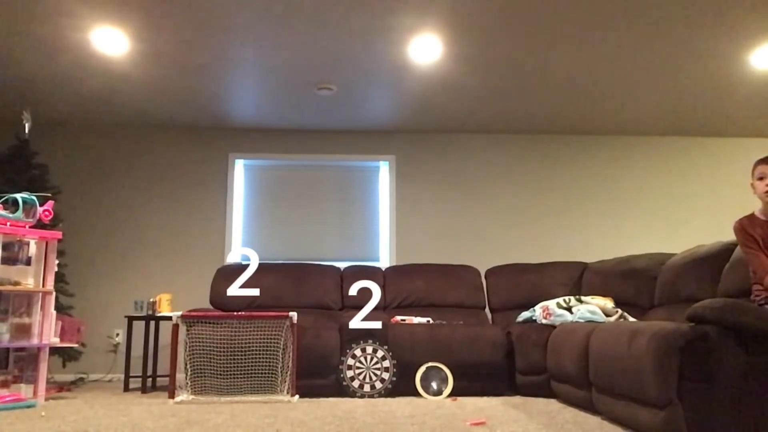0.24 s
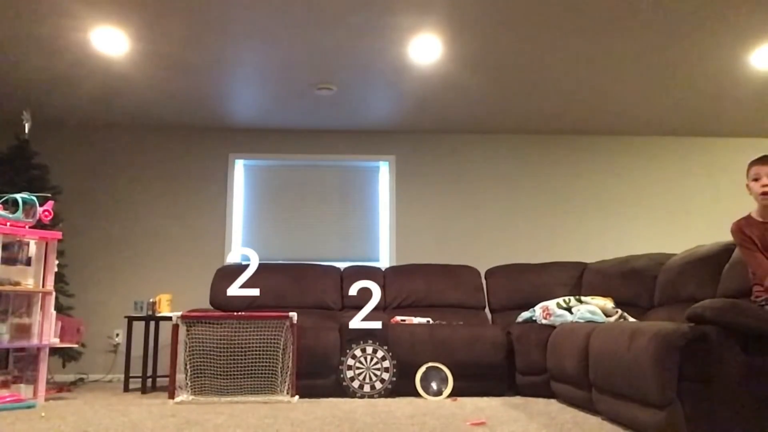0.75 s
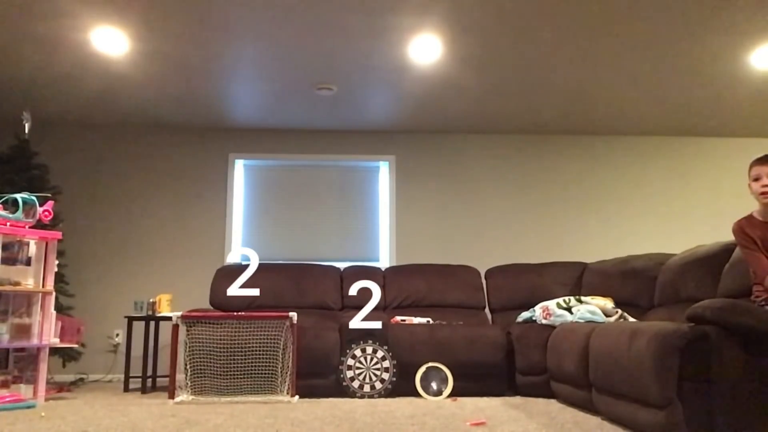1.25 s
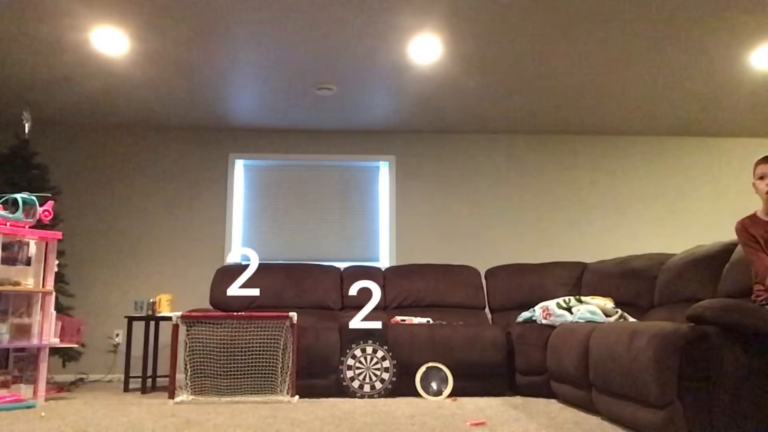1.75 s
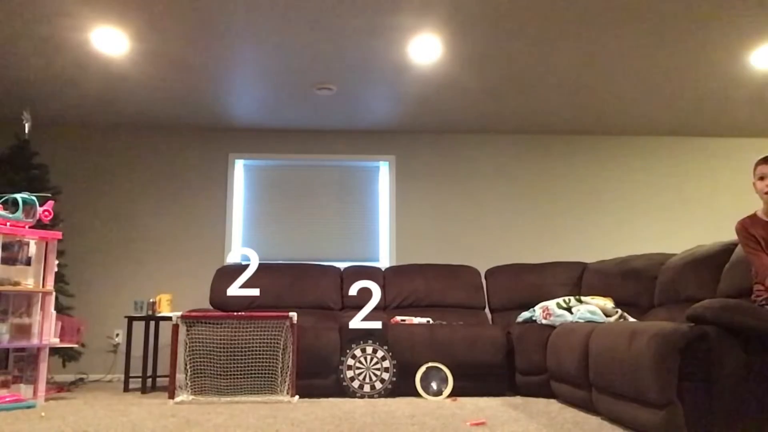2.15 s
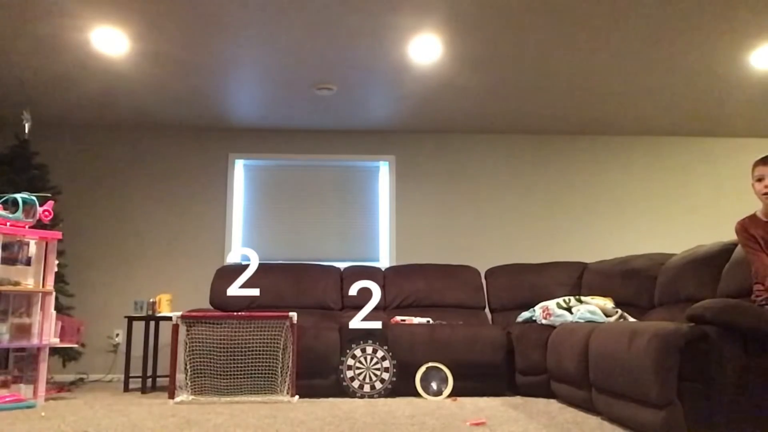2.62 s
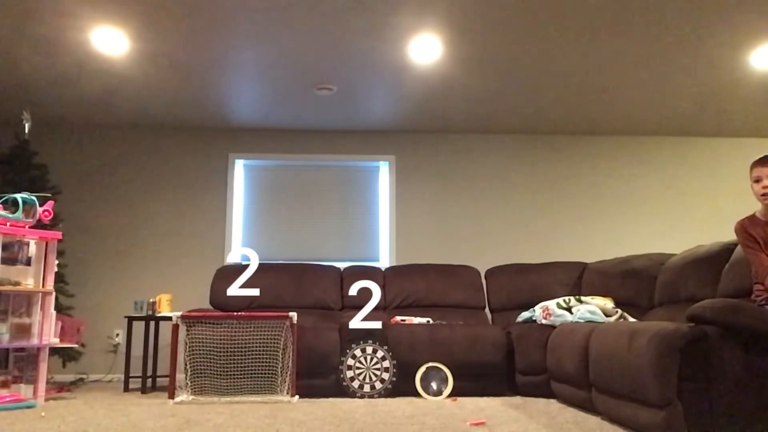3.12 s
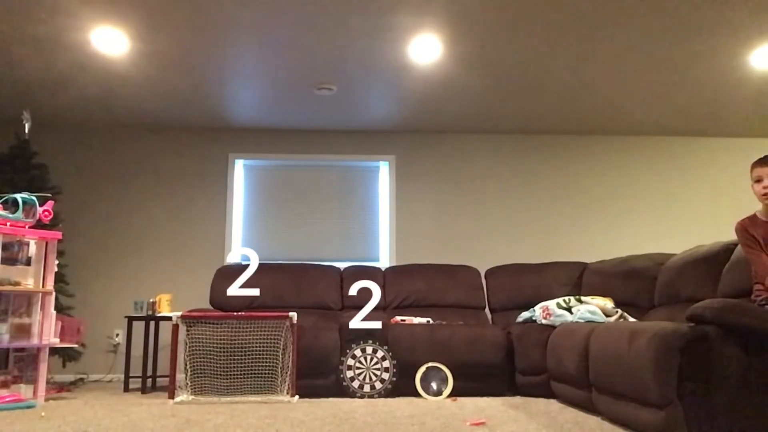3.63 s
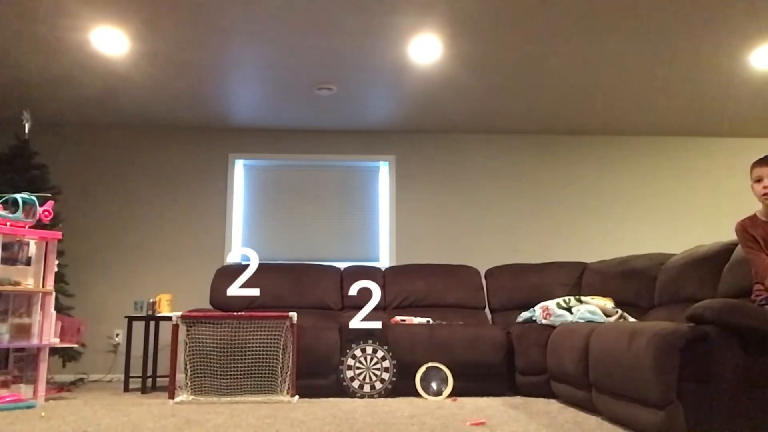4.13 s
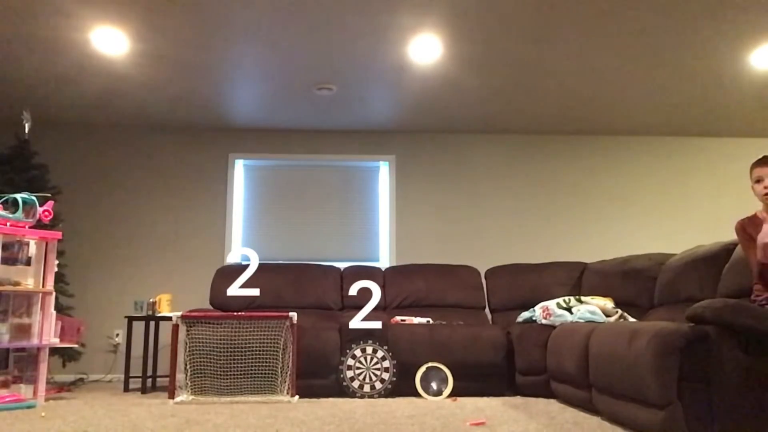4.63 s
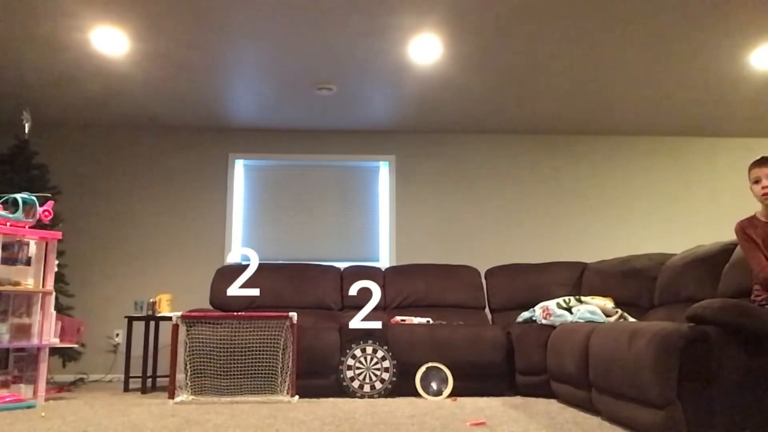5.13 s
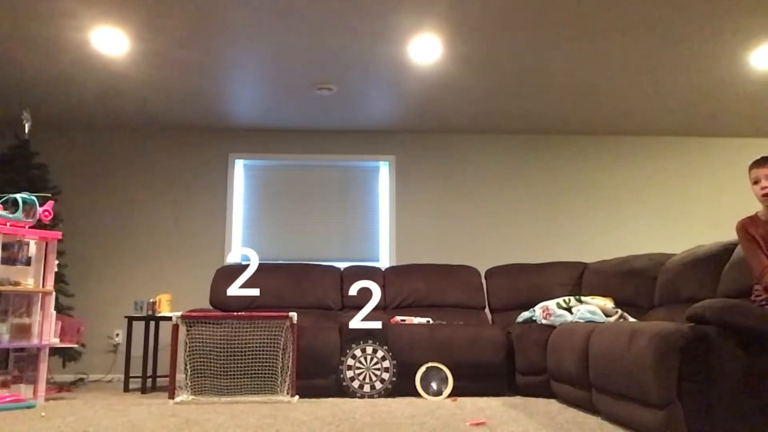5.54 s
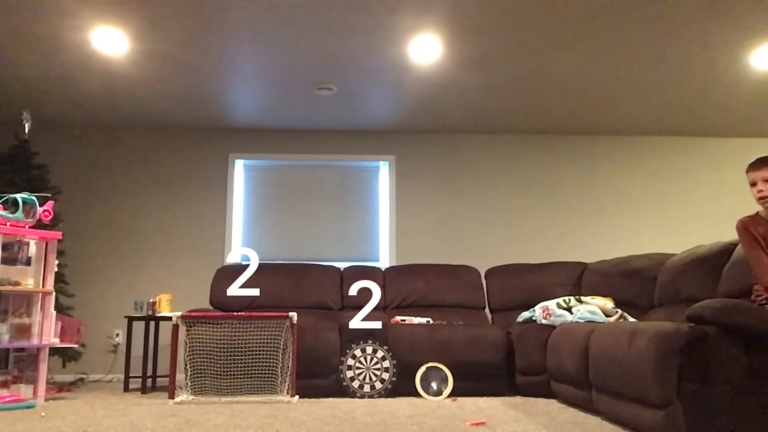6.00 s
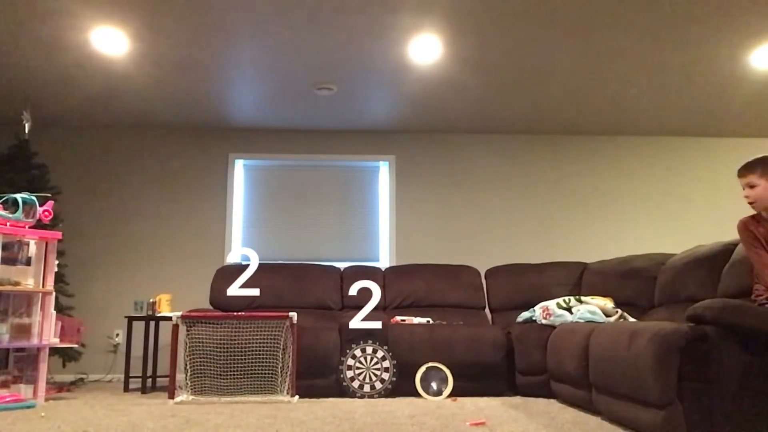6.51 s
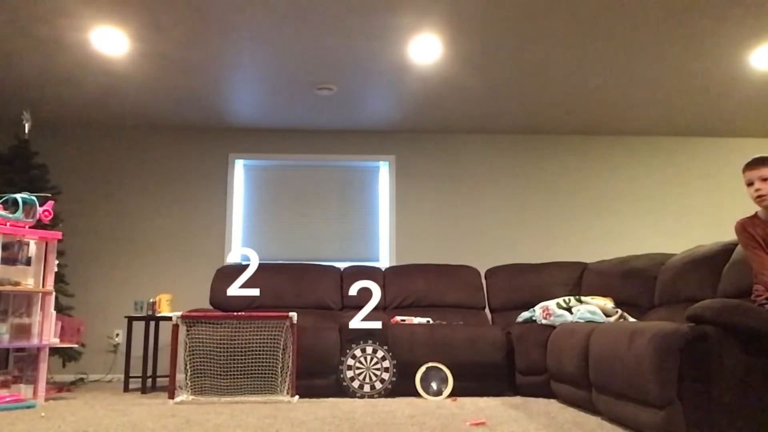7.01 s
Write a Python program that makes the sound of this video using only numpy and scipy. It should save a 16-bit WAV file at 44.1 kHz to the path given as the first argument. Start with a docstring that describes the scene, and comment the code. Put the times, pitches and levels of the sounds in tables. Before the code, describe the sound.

A plastic dart blaster is handled with light clicks, cocked with two sharp latch snaps, then fired with a hollow airy pop in a carpeted living room.

```python
"""Toy dart blaster indoors

A plastic dart blaster is handled, cocked and fired close to a phone in a carpeted living room.
Its ticks, latches and snaps are short noise cracks plus fading tones of the shell, body, grip and spring.
The shot adds a plunger slam, ringing air in the barrel and a puff of noise; a room echo follows it all.
Soft thuds of low noise come through the floor, over steady humming tones and faint hiss."""
import sys
import numpy as np
from scipy import signal
from scipy.fft import rfft, irfft
from scipy.io import wavfile
from scipy.ndimage import uniform_filter1d

SR = 44100
rng = np.random.default_rng(int(sys.argv[2]) if len(sys.argv) > 2 else 0)


def unload_wav(signal):
    """Save mono or channel-first audio to the path in sys.argv[1] as 16-bit WAV at rate SR, clipped to [-1, 1]."""
    wavfile.write(
        sys.argv[1],
        SR,
        np.round(np.clip(np.atleast_2d(signal).T, -1, 1) * 32767).astype(np.int16),
    )


N = 320301
TIME = np.arange(N) / SR

# In tables of tones and noise colours, levels are relative: the whole is scaled where it is used.
# A blow's ring level is shifted by ring_db for the direction; "over ring" counts from the listed level.

# hum of an appliance: f/Hz, rms level/dB around which it wavers
HUM_TONES = [(120, -54.5), (200, -81), (240, -82), (341, -84)]
# colour of the still room and microphone hiss: f/Hz, level/dB
FLOOR_COLOUR = [(25, -16.5), (40, -6), (55, 6.5), (72, 14.5), (100, 6.5), (160, 0.5), (230, -5.5),
                (330, -6.5), (450, -15), (800, -18.5), (1600, -19.5), (4000, -24.5), (10000, -29.5),
                (11800, -24), (12600, -32.5), (15000, -35)]
FLOOR_DB = -61  # rms level of that noise
# soft thuds through the floor: t/s, t60/s, level/dB
THUD_EVENTS = [(.262, 0.32, -46), (4.0, .98, -47), (5.02, 1.75, -53), (5.45, 1.1, -40), (5.76, 1.1, -50.5),
               (6.122, 0.18, -40), (6.82, .31, -48), (6.89, 0.9, -46)]
# colour of a thud: f/Hz, level/dB
THUD_COLOUR = [(25, -49.5), (42, -6.5), (60, 3.5), (88, 7.5), (115, -7.5), (170, -20.5), (300, -39.5),
               (800, -74.5)]
THUD_RISE_S = 0.021
# lowest room tones, woken by the shot: f/Hz, level/dB, t60/s
BOOM_TONES = [(61.6, -1.5, 0.37), (54.6, -10, .3), (124, -3.5, 0.25)]
# room reflections by pitch: f/Hz, level/dB, early t60/s, late t60/s
ROOM_BANDS = [(150, 1, 0.3, 0.34), (500, -10.5, 0.34, 0.79), (1080, -4.5, 0.26, .72),
              (1560, -12.5, 0.52, .75), (2100, -4, 0.16, 0.62), (3250, 0.5, .32, 0.8),
              (4740, -4.5, 0.24, 0.76), (8000, -8.5, .28, .52), (11100, -5.5, 0.25, .46),
              (15000, -8, 0.16, .36)]
SIDE_COUNT = 3  # directions in which the blaster's sound reaches the room

# hands rubbing on plastic: t/s, length/s, level/dB
HAND_RUBS = [(0.327, .15, -55), (1.175, 0.082, -65.5), (1.425, 0.053, -68), (1.834, 0.078, -67.5),
             (7.159, 0.089, -62.5)]
# colour of rubbing and scraping: f/Hz, level/dB
RUB_COLOUR = [(200, -9.5), (900, 2.5), (1500, 11.5), (2300, -1), (3100, -3.0), (5500, -7),
              (10000, -11.0), (15000, -16.5)]
# the padded grip: f/Hz, level/dB, t60/s
GRIP_TONES = [(195, 2.5, 0.051), (255, -4.5, 0.087), (328, -3, 0.15), (418, 1.5, 0.068)]
# steel spring and catch: f/Hz, level/dB, t60/s
SPRING_TONES = [(6400, -2.5, .02), (6760, 1, 0.029), (8140, -2.5, .03), (8970, -2.5, 0.062),
                (9720, -0.5, 0.024), (10500, -4, .025)]
# hollow shell: f/Hz, level/dB, t60/s
SHELL_TONES = [(1176, -9, 0.028), (1300, -7, 0.031), (1511, 1, 0.037), (1740, -2.5, .022),
               (1903, -5.5, .028), (2031, -3.5, 0.011), (2320, -12.5, .02), (2732, -8.5, .04),
               (3056, -10, .035), (3315, -14, 0.034), (3890, -13.5, 0.04), (4700, -13.5, 0.02)]
# the whole body flexing: f/Hz, level/dB, t60/s
BODY_TONES = [(426, -5.5, 0.03), (537.6, 0.5, 0.026), (690, 2, 0.029), (802, -3, 0.032),
              (894.6, 0.5, 0.024), (1032, -4.5, 0.03)]
# colour of the crack of hard plastic: f/Hz, level/dB
CRACK_COLOUR = [(200, -26.5), (800, -12.5), (2000, 1), (3200, -1), (4600, 2), (5500, 0.5), (6600, 1),
                (8500, 2), (10500, 0.5), (12500, -3), (15500, -13)]

# hands knock the blaster: t/s, shell ring level/dB,
# then level/dB over ring of: crack, low knock, grip bump, tick of a loose part
KNOCK_EVENTS = [(0.2218, -50, -10, 4.5, 10, -4), (.252, -46, -8, 0, 2.5, -4),
                (.348, -36, -20.5, -7, -6, -12.5), (.400, -42.5, -17, 6, -6, -8),
                (0.996, -57, 2, -7, -15, -23), (1.256, -52.5, -16, -6, -15, -23),
                (1.514, -49.5, -24, -2, -6, -24), (2.02, -55.5, -14, 0, -2, -24),
                (2.062, -54, -4, -2, -11.5, -19.5), (2.407, -43.5, -14, -18.5, -18, 0),
                (2.4372, -42.5, -5.5, -11, -11.5, -1), (2.447, -43, 2, -11, -20.5, -1.5),
                (2.579, -48, -22, 1.5, -15.5, -12), (2.773, -39, -2.5, -3.5, -16.5, -16),
                (6.564, -59.5, -4, -8, -16, -13), (7.183, -44.5, -16, -1, -14.5, -22)]
# the loose part's delay after a knock; its crack and low knock over its own ring
LOOSE_S, LOOSE_CRACK_DB, LOOSE_KNOCK_DB = .0105, -0.5, -4.5
# latches snap while cocking: t/s, shell ring level/dB,
# then level/dB over ring of: crack, low knock, spring ping, second contact
LATCH_EVENTS = [(2.5922, -33, 2.5, -16.5, -5, -17), (2.6180, -29.5, 5.5, -10, 5.5, -2.5),
                (2.7375, -27, 9, 2, -10, -5), (3.685, -30.5, 8.5, -12, 1.5, -7),
                (3.7053, -28.5, 9.5, -8, 11, 4), (3.7141, -12.5, 0, -5, -6, -12.5)]
# delay of a latch's second contact; jolt of the grip over the latch's ring
SEAT_S, LATCH_GRIP_DB = .0072, -26.5
# the slide is pulled back, then pushed home: t/s, length/s, first ring level/dB, last ring level/dB
SLIDE_STROKES = [(2.705, 0.027, -35.5, -34.5), (3.6357, .051, -49, -27)]
# typical time between the slide's catches and its scatter (share of that time)
CHATTER_S, CHATTER_SCATTER = 0.012, .1
CHATTER_CRACK_DB, CHATTER_KNOCK_DB, SCRAPE_DB = -2.5, -9, -9  # over ring

# catch lets go, plunger slams, dart leaves: t/s, shell ring level/dB,
# then level/dB over ring of: crack, low knock
SHOT_EVENTS = [(6.1224, -30.5, 1.5, -13), (6.1244, -25, 13, -10), (6.128, -26, -8.5, -4.5)]
# the plunger's first rebound: delay after the slam and ring level
# each further rebound: delay multiplied by the growth, level raised by the step
REBOUND_S, REBOUND_GROWTH, REBOUND_DB, REBOUND_STEP_DB = 0.0065, 2.6, -30.5, 1
REBOUND_CRACK_DB, REBOUND_KNOCK_DB = 2.5, -2  # over ring
SHOT_GRIP_DB = -36.5  # recoil of the grip
# air column of the barrel: f/Hz, level/dB, t60/s
BARREL_TONES = [(167.5, -12, 0.033), (414, 0, 0.081), (974, 8, 0.063), (1169, -2, 0.15), (1560, 7.5, 0.046),
                (2020, -3, 0.049), (2914, -2, 0.19), (3340, -3.5, 0.067), (4160, -4.5, 0.087),
                (4800, -2, 0.27)]
# colour of the escaping air: f/Hz, level/dB
AIR_COLOUR = [(60, 0), (250, -6.5), (700, -27.5), (1400, 7), (2300, -1), (3200, -2), (5000, 2), (7500, -1),
              (11000, 1.5), (15000, -11)]
TOP_HZ = 15900  # upper limit of the phone's sound


def undb(db):
    """Turn decibels into gain."""
    return 10 ** (np.asarray(db) / 20)


def unit(x):
    """Scale to rms 1."""
    return x / np.sqrt(np.mean(x ** 2))


def fade(t, t60):
    """Exponential decay: 60 dB down after t60 seconds."""
    return np.exp(-np.log(1000) * t / max(t60, 1e-4))


def add(out, s, x):
    """Mix x into out from second s on."""
    i = int(max(s, 0) * SR)
    out[i:i + len(x)] += x[:max(N - i, 0)]


def highpass(x, hz):
    """Take away the bass below hz."""
    sos = signal.butter(4, hz, "high", fs=SR, output="sos")
    return signal.sosfilt(sos, x)


def colour(x, points, size=8192):
    """Filter x to follow the colour points, without pre-echo; white noise keeps its power."""
    hz, db = np.transpose(points)
    f = np.maximum(np.fft.rfftfreq(size, 1 / SR), 1)
    curve_db = np.interp(np.log(f), np.log(hz), db)
    # folding the cepstrum makes the filter respond only after its input
    cepstrum = irfft(np.log(undb(curve_db)))
    cepstrum[1:size // 2] *= 2
    cepstrum[size // 2 + 1:] = 0
    response = irfft(np.exp(rfft(cepstrum)))
    return signal.fftconvolve(x, response / np.linalg.norm(response))[:len(x)]


def walk(rate):
    """Slow random drift around 0 with about rate new values a second."""
    knots = np.arange(0, TIME[-1] + 1, 1 / rate)
    return np.interp(TIME, knots, rng.standard_normal(len(knots)))


def ring(tones, detune):
    """Struck tones, starting near rms 1; each blow lands elsewhere and the grip shifts them a little."""
    t = TIME[:int(SR * max(tone[2] for tone in tones))]
    out, power = 0, 0
    for hz, db, t60 in tones:
        shift, scatter_db, side = rng.standard_normal(3)
        gain = undb(db + scatter_db)
        wave = np.sin(2 * np.pi * hz * (1 + detune * shift) * t)
        out = out + np.sign(side) * gain * wave * fade(t, t60)
        power += gain ** 2 / 2
    return out / np.sqrt(power)


def swell(x, rise_s):
    """Let a ring build up while the push lasts."""
    return x * np.minimum(TIME[:len(x)] / rise_s, 1)


def burst(rise_s, t60, size=2048, order=2):
    """Dense noise that swells and dies, its energy spread almost evenly over all pitches."""
    t = TIME[:size]
    shape = np.minimum(t / rise_s, 1) * fade(np.maximum(t - rise_s, 0), t60)
    x = rng.standard_normal(size) * shape
    for _ in range(order):
        # level all pitches, then shape in time again
        even = irfft(np.exp(1j * np.angle(rfft(x))))
        x = even * np.sqrt(shape)
    return x * np.linalg.norm(shape) / np.linalg.norm(x)


def background():
    """An appliance hums, each tone wavering slightly in level, over low rumble and hiss."""
    hum = np.zeros(N)
    for hz, db in HUM_TONES:
        gain = np.sqrt(2) * undb(db + .5 * walk(4.5))
        hum += gain * np.sin(2 * np.pi * (hz * TIME + rng.random()))
    return hum + undb(FLOOR_DB) * unit(colour(rng.standard_normal(N), FLOOR_COLOUR))


def thuds():
    """Shifting weight and the jolt of the shot stir floor and room: low noise that rises and dies away."""
    power = np.zeros(N)
    t = TIME[:SR]  # each thud lasts a second at most
    for s, t60, db in THUD_EVENTS:
        shape = np.minimum(t / THUD_RISE_S, 1) * fade(np.maximum(t - THUD_RISE_S, 0), t60)
        add(power, s, (undb(db) * shape) ** 2)
    low_noise = colour(rng.standard_normal(N), THUD_COLOUR)
    # even out the noise's own swings in loudness
    low_noise /= np.sqrt(uniform_filter1d(low_noise ** 2, size=3000) + 1e-12)
    return low_noise * np.sqrt(power)


def boom():
    """The jolt of the shot sets the room's lowest tones swinging; they build up and die away."""
    out = np.zeros(N)
    swing = swell(ring(BOOM_TONES, detune=.01), rise_s=0.018)
    add(out, SHOT_EVENTS[0][0], undb(-32.5) * swing)
    return highpass(out, hz=41.8)


def room(x, late_db=-13, build_s=0.0061):
    """Walls and ceiling answer at once; sofa and carpet soak up most, leaving a weak longer tail."""
    t = TIME[:SR]
    # the first reflections stand out one by one, later ones merge
    uneven_db = 6 * fade(t, .25) * rng.standard_normal(SR)
    noise = rfft(rng.standard_normal(SR) * undb(uneven_db))
    log_f = np.log(np.maximum(np.fft.rfftfreq(SR, 1 / SR), 1))
    centres = np.log(np.array(ROOM_BANDS)[:, 0])
    response = 0
    # each band overlaps its neighbours and fades at its own speed
    for share, (hz, db, early, late) in zip(np.eye(len(ROOM_BANDS)), ROOM_BANDS):
        decay = fade(t, early) + undb(late_db) * fade(t, late)
        shape = decay * np.minimum(t / build_s, 1) ** 2
        band = irfft(noise * np.interp(log_f, centres, share), SR)
        response = response + undb(db) * band * shape / np.linalg.norm(shape)
    return signal.fftconvolve(x, response)[:N]


def rubbing():
    """Tiny catches of skin and plastic: a hand's rub swells and fades, the scrape follows the slide's push."""
    contact = np.zeros(N)
    for s, length, db in HAND_RUBS:
        add(contact, s, undb(db) * np.hanning(int(length * SR)))
    for s, length, first_db, last_db in SLIDE_STROKES:
        push_db = np.linspace(first_db, last_db, int(length * SR))
        add(contact, s, undb(SCRAPE_DB + push_db))
    grains = unit(rng.standard_normal(N) * undb(1.3 * rng.standard_normal(N)))
    return colour(contact * grains, RUB_COLOUR)


def squeak(start=1.61, length=0.061, hz=5200, bend=0.11, db=-71):
    """A tight joint gives one thin, unsteady squeak: a tone and its octave that bend up and back."""
    arch = np.sin(np.pi * np.clip((TIME - start) / length, 0, 1))
    pitch = hz * (1 + bend * arch + .03 * walk(500))
    phase = 2 * np.pi * np.cumsum(pitch) / SR
    return undb(db) * arch * (np.sin(phase) + 0.43 * np.sin(2 * phase))


def bumps():
    """The grip bumps dully against the hand at every knock, latch and recoil."""
    jolts = [(s, db + grip_db) for s, db, _, _, grip_db, _ in KNOCK_EVENTS]
    jolts += [(s, db + LATCH_GRIP_DB) for s, db, *_ in LATCH_EVENTS]
    jolts.append((SHOT_EVENTS[-1][0], SHOT_GRIP_DB))
    out = np.zeros(N)
    for s, db in jolts:
        add(out, s, undb(db) * ring(GRIP_TONES, detune=0.033))
    return highpass(out, hz=160)


def spring():
    """Each latch gives the steel spring a short bright ping."""
    out = np.zeros(N)
    for s, db, _, _, ping_db, _ in LATCH_EVENTS:
        ping = swell(ring(SPRING_TONES, detune=0.0025), rise_s=.0006)
        add(out, s, undb(db + ping_db) * ping)
    return out


def plastic(blows, rise_s, crack_t60, ring_db, slowing=0.24):
    """Each blow cracks at the contact, rings the shell and flexes the body."""
    rings, cracks = np.zeros(N), np.zeros(N)
    for s, db, crack_db, knock_db in blows:
        push_s = rise_s * undb(-slowing * (db + crack_db))  # gentler blows press for longer
        add(cracks, s, undb(db + crack_db) * burst(push_s, crack_t60))
        add(rings, s, undb(db + ring_db) * swell(ring(SHELL_TONES, detune=0.013), push_s))
        add(rings, s, undb(db + knock_db) * swell(ring(BODY_TONES, detune=.018), push_s))
    return highpass(rings + colour(cracks, CRACK_COLOUR), hz=330)


def knock_blows():
    """Each knock on the shell throws a loose part, which lands with a tick of its own."""
    blows = []
    for s, db, crack_db, knock_db, _, loose_db in KNOCK_EVENTS:
        blows.append((s, db, crack_db, knock_db))
        blows.append((s + LOOSE_S, db + loose_db, LOOSE_CRACK_DB, LOOSE_KNOCK_DB))
    return blows


def latch_blows():
    """Each latch strikes twice: it trips, then seats."""
    blows = []
    for s, db, crack_db, knock_db, _, seat_db in LATCH_EVENTS:
        blows.append((s, db, crack_db, knock_db))
        blows.append((s + SEAT_S, db + seat_db, crack_db, knock_db))
    return blows


def slide_blows():
    """The slide catches along its track at uneven steps, harder as the push grows."""
    blows = []
    for start, length, first_db, last_db in SLIDE_STROKES:
        gaps = CHATTER_S * np.exp(CHATTER_SCATTER * rng.standard_normal(size=16))
        for t in np.cumsum(gaps) - gaps[0]:
            if t < length:
                db = first_db + (last_db - first_db) * t / length
                blows.append((start + t, db, CHATTER_CRACK_DB, CHATTER_KNOCK_DB))
    return blows


def rebounds(count):
    """The plunger shudders against its stop after the slam, at ever wider gaps."""
    slam = SHOT_EVENTS[1][0]
    blows = []
    for k in range(count):
        s = slam + REBOUND_S * REBOUND_GROWTH ** k
        blows.append((s, REBOUND_DB + k * REBOUND_STEP_DB, REBOUND_CRACK_DB, REBOUND_KNOCK_DB))
    return blows


def shot(ring_db):
    """The plunger flies forward; air rings the barrel and hisses out behind the dart."""
    blows = SHOT_EVENTS + rebounds(count=3)
    out = plastic(blows, rise_s=0.00058, crack_t60=.015, ring_db=ring_db)
    start = SHOT_EVENTS[0][0]
    add(out, start + .004, undb(-25.5 + ring_db) * ring(BARREL_TONES, detune=0.0041))
    puff = colour(burst(rise_s=0.014, t60=0.23, size=16384), AIR_COLOUR)
    add(out, start, undb(-25.0) * puff)
    return highpass(out, hz=80.2)


def blaster(blows, ring_db):
    """Handling and shot as sent out one way; ring_db is how strongly shell and barrel ring that way."""
    clicks = plastic(blows, rise_s=0.00055, crack_t60=0.023, ring_db=ring_db)
    handling = clicks + spring() + bumps() + rubbing() + squeak()
    return handling, shot(ring_db)


def scene():
    """Blaster near the microphone, the room around it."""
    blows = knock_blows() + latch_blows() + slide_blows()
    # the flat panels face the microphone; each side of the room gets another mix, with less ring
    handling, firing = blaster(blows, ring_db=2.5)
    sides = [blaster(blows, ring_db=0.5) for _ in range(SIDE_COUNT)]
    # the muzzle points into the room, so the shot wakes it more
    echoes = [room(undb(-1.42) * clicks + undb(-0.37) * blast) for clicks, blast in sides]
    echo = sum(echoes) / np.sqrt(SIDE_COUNT)
    return (background() + thuds() + boom() + echo + handling + firing)[None]


def record(dry):
    """The phone clips the peaks at full scale, then cuts the highest treble."""
    clipped = np.clip(dry, -1, 1)
    return signal.sosfilt(signal.ellip(10, .2, 80, TOP_HZ, fs=SR, output="sos"), clipped)


dry = scene()
out = record(dry)
unload_wav(out)
```